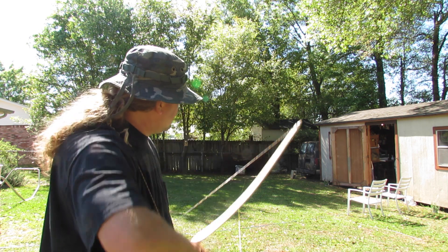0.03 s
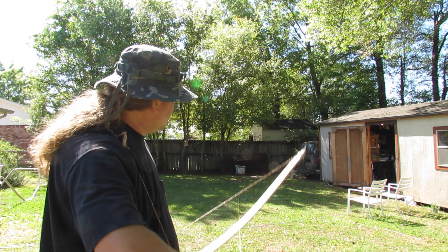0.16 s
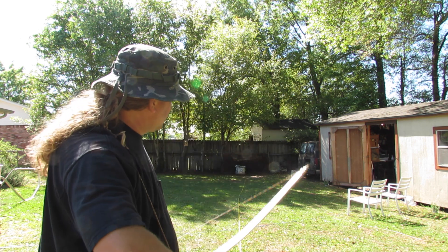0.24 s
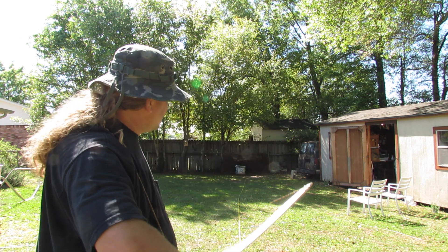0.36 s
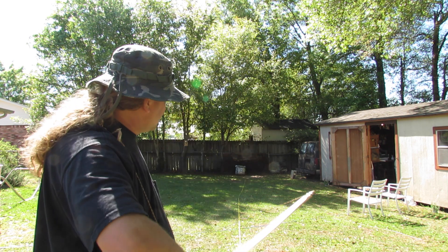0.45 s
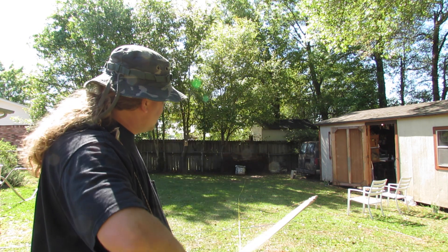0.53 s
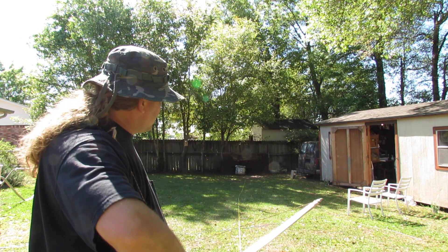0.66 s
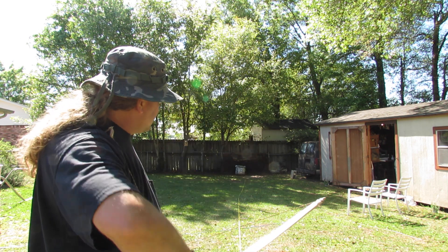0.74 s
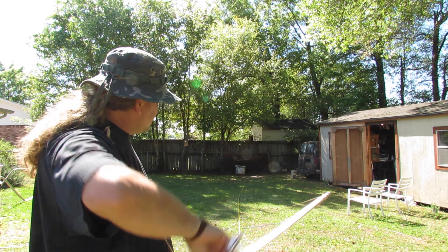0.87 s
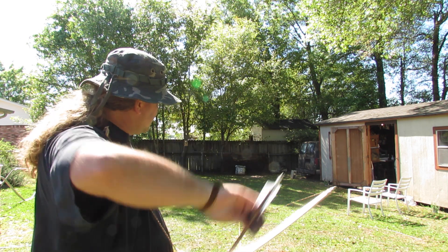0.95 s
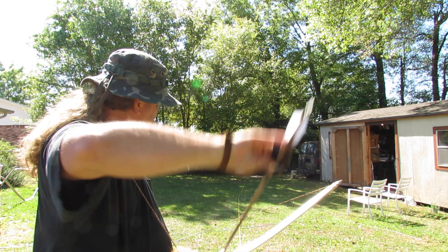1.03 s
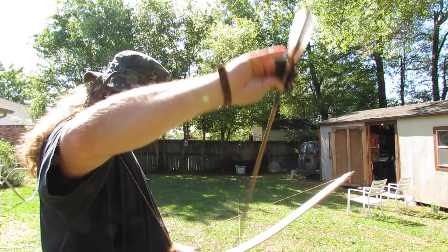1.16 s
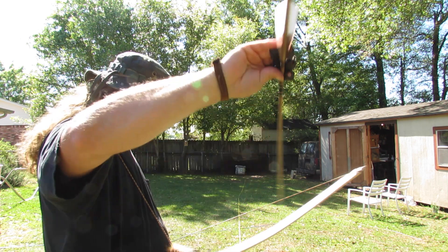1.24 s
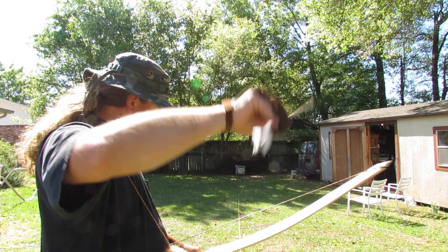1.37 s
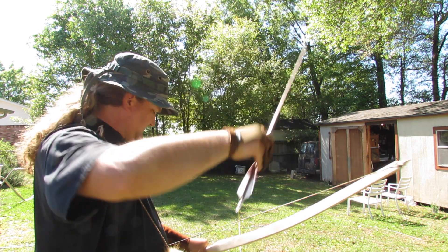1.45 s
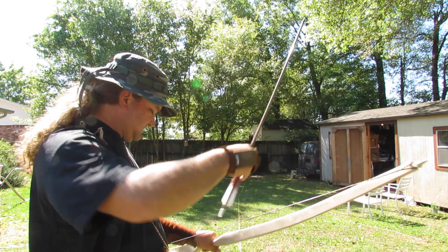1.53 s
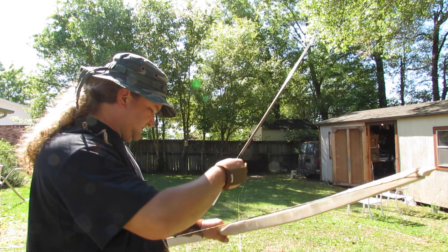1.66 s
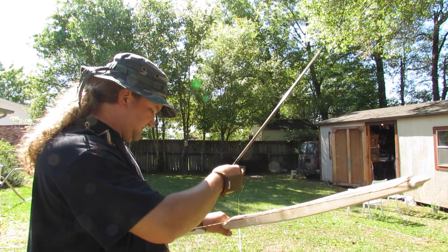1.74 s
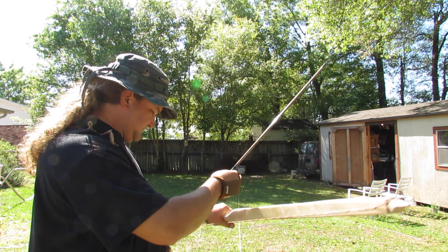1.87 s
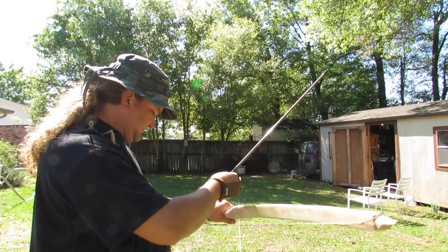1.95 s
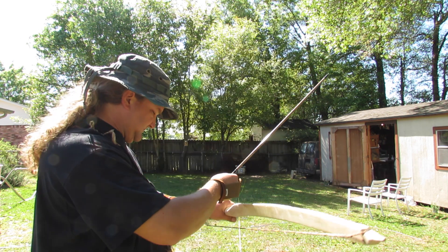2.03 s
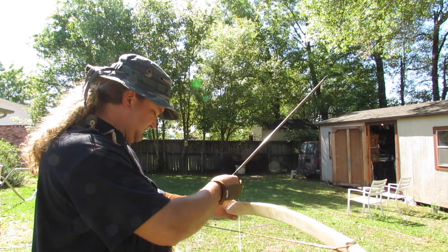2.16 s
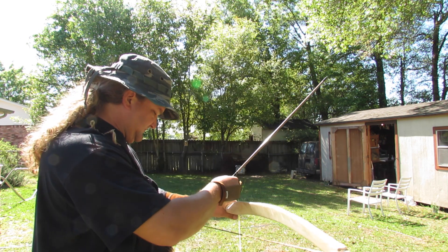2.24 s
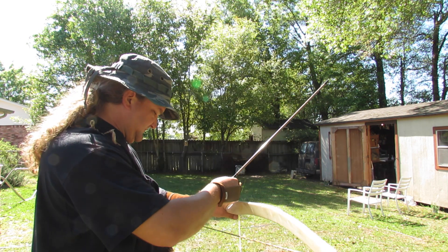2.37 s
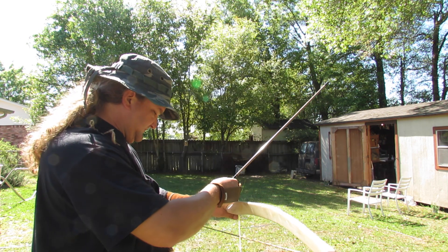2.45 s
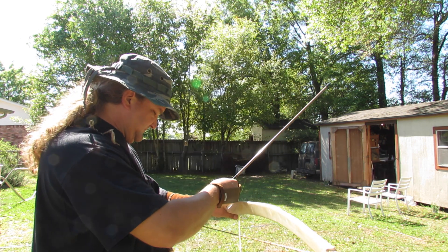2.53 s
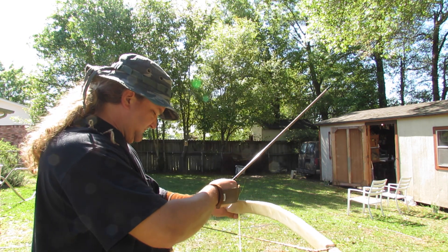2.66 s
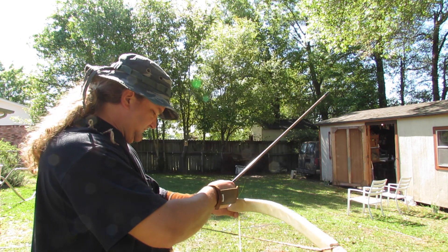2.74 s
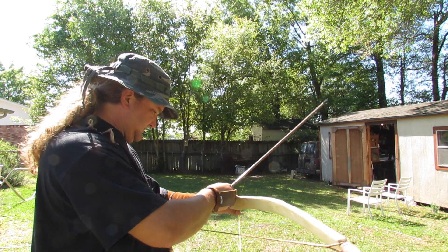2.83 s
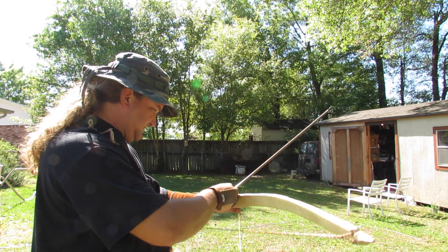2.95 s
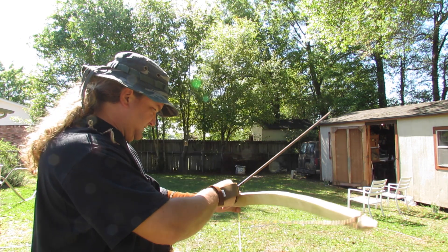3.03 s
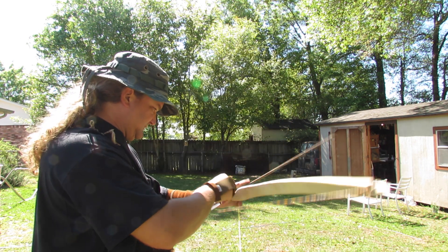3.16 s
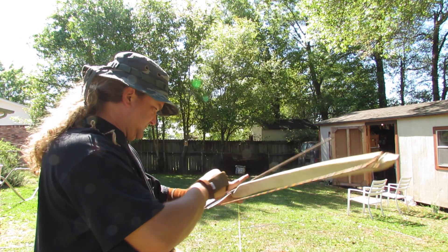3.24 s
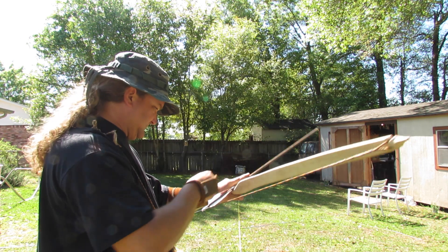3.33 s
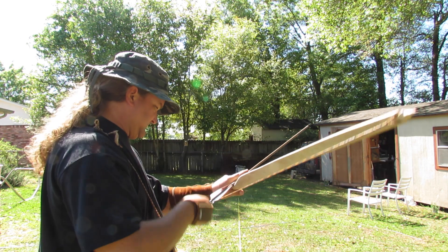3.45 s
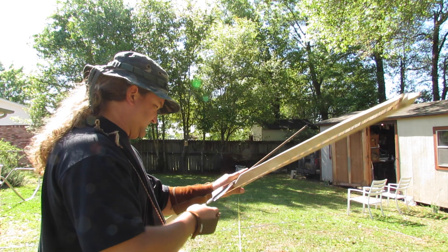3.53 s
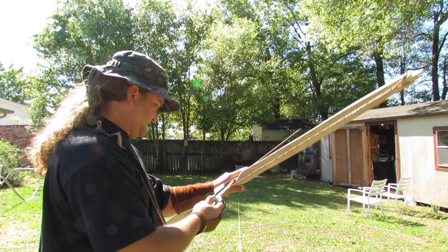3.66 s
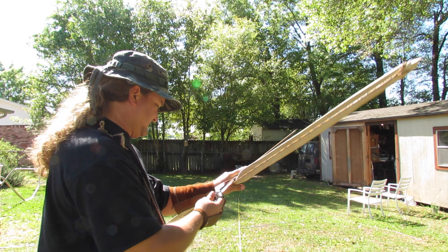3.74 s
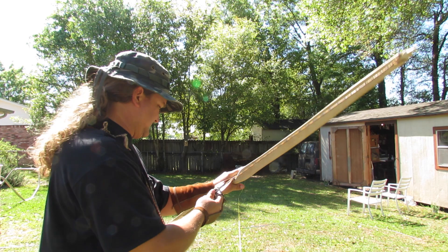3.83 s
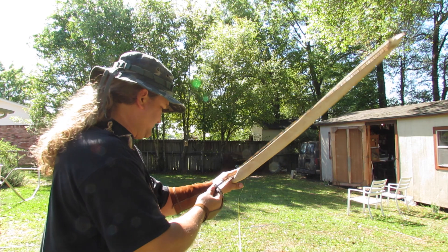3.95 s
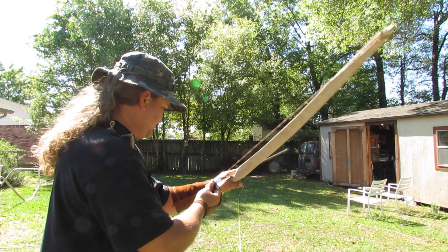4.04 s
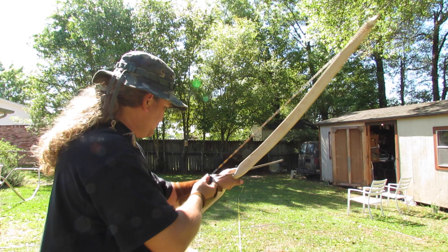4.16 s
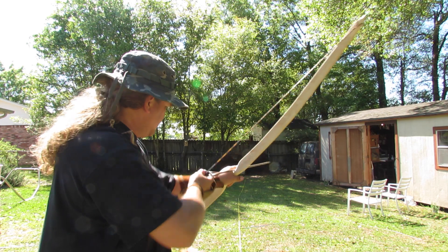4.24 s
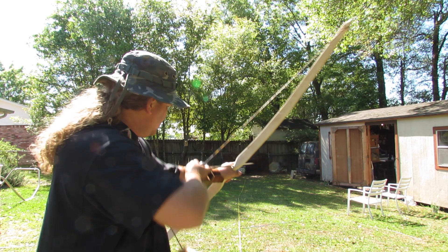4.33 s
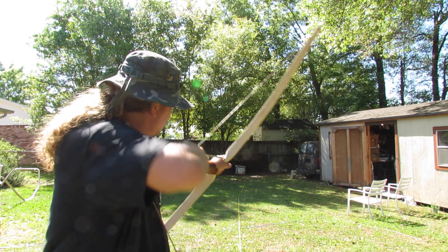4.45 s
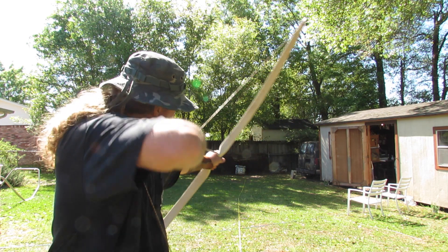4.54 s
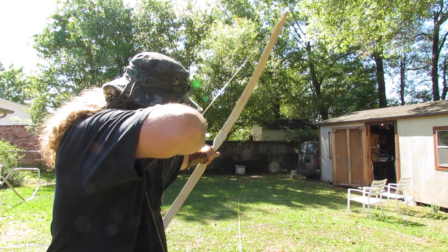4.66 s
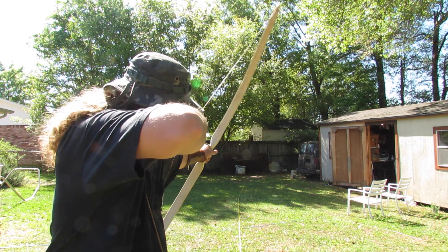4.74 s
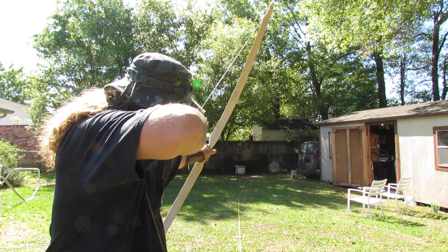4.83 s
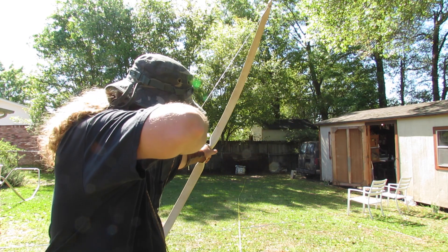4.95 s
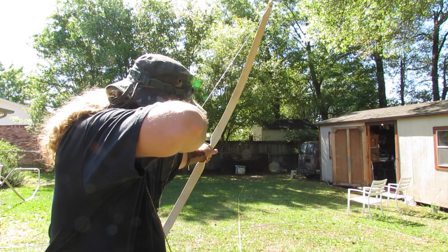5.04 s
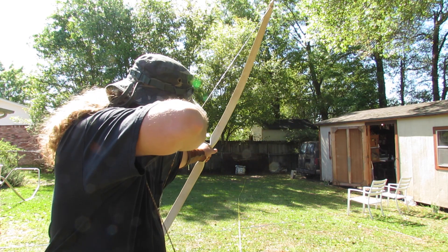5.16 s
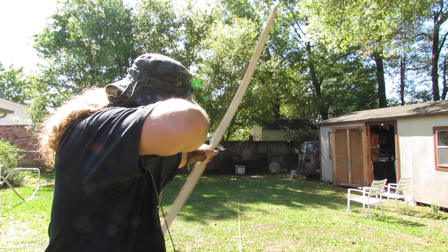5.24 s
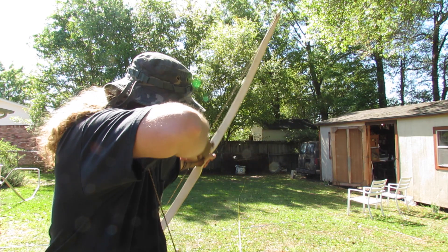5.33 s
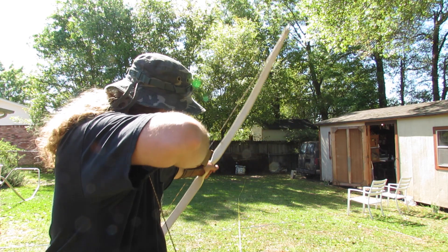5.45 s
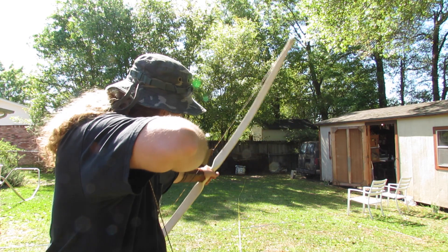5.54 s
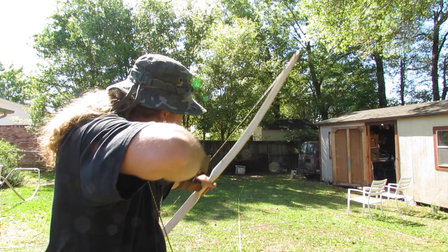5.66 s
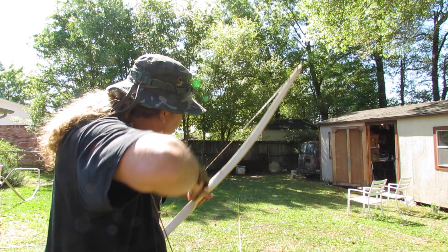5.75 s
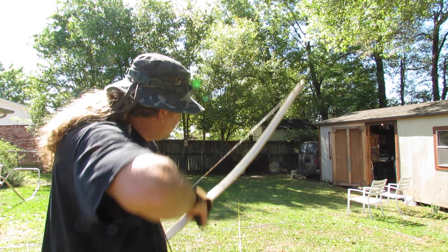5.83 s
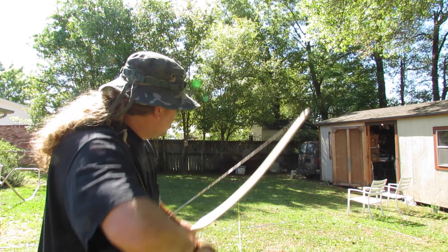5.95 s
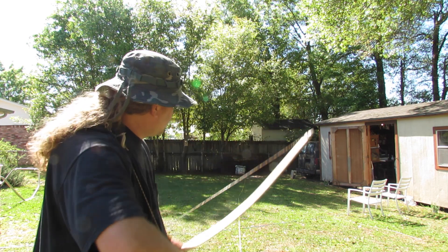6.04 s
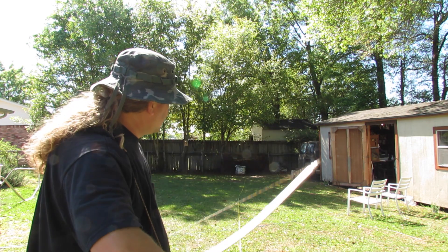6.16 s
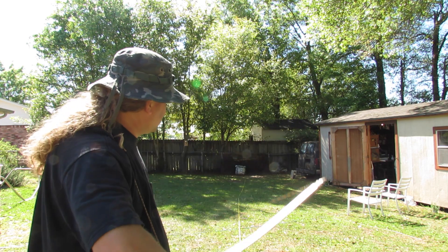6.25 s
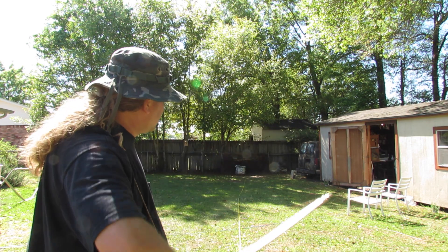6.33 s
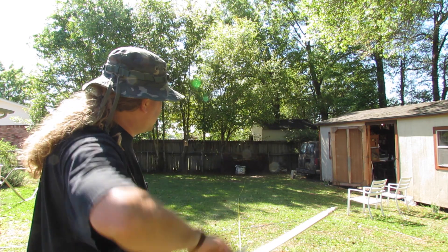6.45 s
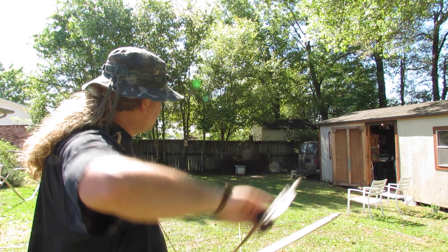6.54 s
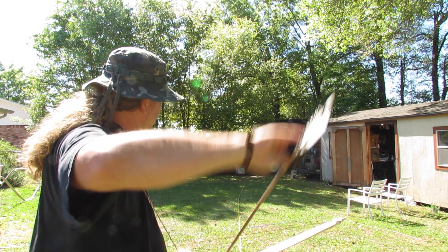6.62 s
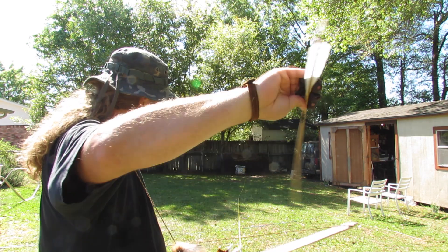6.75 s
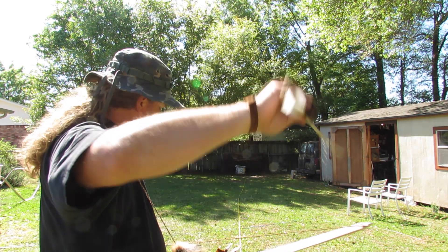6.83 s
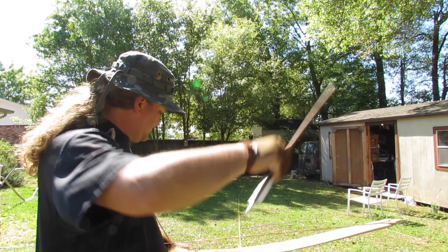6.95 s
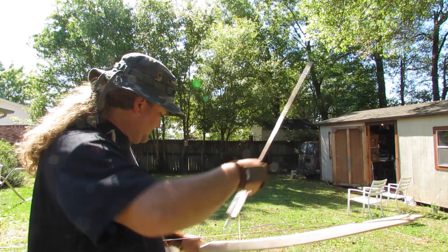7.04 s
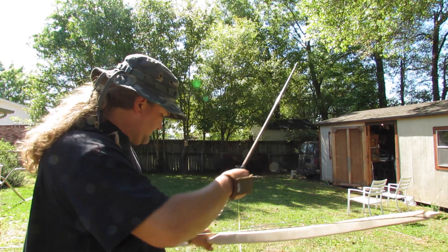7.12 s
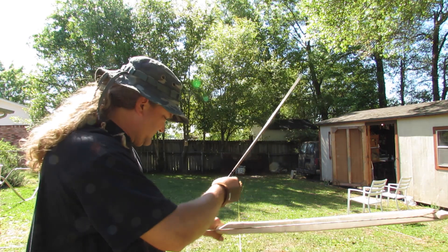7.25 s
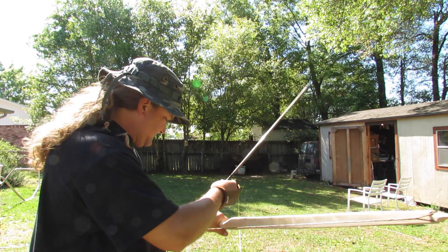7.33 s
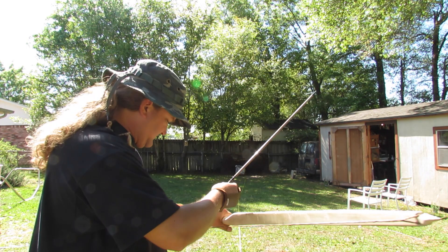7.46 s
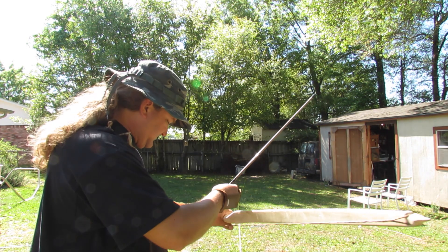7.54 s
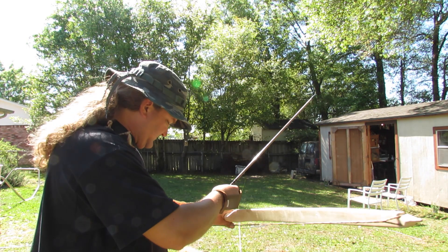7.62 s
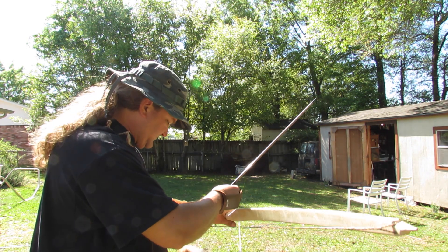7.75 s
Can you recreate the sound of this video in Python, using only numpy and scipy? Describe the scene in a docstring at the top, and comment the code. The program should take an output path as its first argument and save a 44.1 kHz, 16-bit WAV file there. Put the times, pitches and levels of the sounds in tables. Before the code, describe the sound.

Outdoors, close to an archer: cloth rustles and arrow shafts rattle as one is pulled out, then small wooden ticks as it is nocked on the bow. Wind bumps the microphone. The string cracks loudly, the arrow smacks a target about half a second later with short fence echoes, then rustling and light taps resume as another arrow is fetched. Faint birds and distant traffic.

```python
"""Breezy back yard: an archer pulls an arrow, nocks it, draws and shoots; the arrow smacks a far target.
Bow, target and arrow shafts are sums of dying modes; cracks, ticks and snaps are short noise bursts.
Cloth is hiss in clumps of tiny slips; birds are gliding sines; fences return sparse random echoes.
Gusts are single pressure cycles at the right microphone port; air and traffic are patchy noise.
"""
import sys
import numpy as np
from scipy import signal
from scipy.fft import rfft, irfft, next_fast_len
from scipy.io import wavfile
from scipy.ndimage import uniform_filter1d

SR = 44100
rng = np.random.default_rng(int(sys.argv[2]) if len(sys.argv) > 2 else 0)


def transcribe(signal):
    """Save signal, clipped to [-1, 1], as a 16-bit WAV file at the path in sys.argv[1]."""
    frames = np.atleast_2d(signal).T
    limited = np.clip(frames, -1, 1)
    pcm = np.round(limited * 32767).astype(np.int16)
    wavfile.write(sys.argv[1], SR, pcm)


N = 343539  # samples

BOW_PAN_DB = -0.6  # left over right, so slightly right
SMALL_HZ = 200  # bow and target are too small to radiate below this


def shot():
    """The shaft scrapes off, the string slaps home, the arrow lands; small bodies radiate little bass."""
    out = scrapes() + slap() + landing()
    return signal.lfilter(*signal.butter(2, SMALL_HZ, "high", fs=SR), out)


# String leaves the fingers, shaft scrapes past the bow hand, limbs rattle.
# Each row: start in seconds, rise in seconds, hold in seconds, fall in seconds, level in dB.
SCRAPE_ROWS = [(5.3027, 0.0034, 0.0048, 0.0065, -24.5), (5.309, .0015, 0.0043, 0.016, -21.5),
               (5.331, 0.0024, 0.0046, 0.018, -24.5)]
# Scrape spectrum. Each row: frequency in Hz, density in dB per Hz.
SCRAPE_SPECTRUM = [(240, -38), (400, -19), (1490, -5), (3750, -16), (6950, -18.5), (8240, -27),
                   (16000, -33)]


def scrapes():
    """Friction at the bow: coloured noise under short swells."""
    out = np.zeros((2, N))
    for start_s, rise_s, hold_s, fall_s, level_db in SCRAPE_ROWS:
        level = amp(level_db) * swell(rise_s, hold_s, fall_s)
        noise = coloured(pair(len(level), 0.92), SCRAPE_SPECTRUM)
        add(out, round(start_s * SR), level * noise, BOW_PAN_DB)
    return out


# String slap. One row: start in seconds, bow ring peak in dB, crack peak in dB.
SLAP_ROW = (5.3305, 1.9, 2)
# Bow modes. Each row: frequency in Hz, level in dB, t60 in seconds.
BOW_MODES = [(810, -4, 0.0052), (1190, 17.5, 0.0056), (1525, -11, 0.059), (8070, 6.5, 0.0038)]


def slap():
    """The string's stop excites the bow modes and a wide-band crack."""
    out = np.zeros((2, N))
    start_s, ring_db, crack_db = SLAP_ROW
    sound = amp(ring_db) * ring(BOW_MODES) + amp(crack_db) * crack(0.0081)
    add(out, round(start_s * SR), sound, BOW_PAN_DB)
    return out


# Arrow hit, then returns from ground, shed and fences.
# Each row: start in seconds, level before dulling in dB, pan as left over right in dB, dullness from 0 to 1.
LANDING_ROWS = [(5.7976, 8, -3, 0.25), (5.803, -4, -3.5, .1), (5.8147, 3, 5, 0.94), (5.861, -14, -1, 0.88),
                (5.892, -23, -1.5, 0.84), (5.984, -21, -1.5, 0.92)]
# Target modes. Each row: frequency in Hz, level in dB, t60 in seconds.
TARGET_MODES = [(389, -18, 0.052), (503, -11, 0.017), (670, -1.5, 0.0081), (1370, 3, 0.0044),
                (1783, 13, 0.0042), (2200, 6, 0.0045), (4750, -12, 0.008)]
SINK_S = 0.0016  # point sinks in: ring gain climbs by 1 per SINK_S, from 0.6 to 1.2
SMEAR = 0.15  # scatter t60 in seconds, per second of echo delay


def landing():
    """Target modes build up as the point sinks in; each later return is scattered and dulled."""
    out = np.zeros((2, N))
    t = np.arange(6000) / SR
    sinking = ring(TARGET_MODES) * np.minimum(t / SINK_S + 0.6, 1.2)
    sinking = sinking / abs(sinking).max()
    t = t[:2000]
    first_s = LANDING_ROWS[0][0]
    for start_s, level_db, pan_db, dull in LANDING_ROWS:
        blow = sinking + amp(-6.0) * crack(0.0048)
        dull = np.clip(dull, 0, 0.95)
        scatter_t60_s = SMEAR * abs(start_s - first_s) + 1e-5
        scatter = (rng.standard_normal(2000) + 3 * (t == 0)) * amp(-60 * t / scatter_t60_s)
        blow = signal.fftconvolve(blow, scatter[None] / np.linalg.norm(scatter), axes=1)
        dulled = signal.lfilter([1 - dull], [1, -dull], blow)
        add(out, round(start_s * SR), amp(level_db) * dulled, pan_db)
    return out


# Crack spectrum. Each row: frequency in Hz, density in dB per Hz.
CRACK_SPECTRUM = [(500, -28), (2200, 5.5), (3500, -10.5), (4700, -6.5), (6000, -15.5), (8000, -3),
                  (11000, -10), (16000, -46)]


def crack(t60_s):
    """Impact crack: a very short wide-band burst, peak 1."""
    burst = pair(6000, 0.69) * amp(-60 * np.arange(6000) / SR / t60_s)
    x = coloured(burst, CRACK_SPECTRUM)
    return x / abs(x).max()


# Shaft and nock taps.
# Each row: start in seconds, tick peak in dB, shaft ring in dB over the tick,
# bow wood in dB over the tick, place struck as a share of the shaft.
TAP_ROWS = [(0.313, -35, -11, -22, .3), (0.4407, -29.5, -8, -25, .07), (0.6612, -22.5, -10, -31, .07),
            (1.126, -21, 7, -14, .07), (2.864, -15, -13, -14.5, 0.1), (2.872, -33, -9, 9, .125),
            (3.0591, -28.5, -12, -23, .125), (3.2367, -25, -1, -4, 0.13), (3.243, -34.5, 5, 5, .125),
            (3.2505, -43, 3, 10, .11), (3.415, -34, -9, -5, .125), (5.31, -8, -16, -10, 0.15),
            (5.3357, -12.5, -4, -3, 0.1), (5.4175, -21.5, -13, -7, .125), (5.431, -26.5, -10, -13, .125),
            (6.2066, -42, 6.5, -15, 0.21), (6.3, -36.5, -8, -2, .12), (6.365, -28.5, -15, -23, .12),
            (6.592, -40, 14, -15, .44), (6.619, -39, 13.5, -15, .44), (6.645, -36, 12, -9, .44),
            (6.658, -38, 12, -15, .44), (6.682, -40, 11.5, -12, .4), (6.7192, -38, -9.5, -25, .12),
            (6.742, -36, -5, 3, .12), (6.767, -44, 5, -13, 0.32)]
# Arrow in hand. Each row: start of use in seconds, tuning as a ratio.
ARROW_ROWS = [(0, 1.0), (2, .955), (6, 1.045)]


def taps():
    """Arrow, nock and bow knock together, each arrow with its own tuning."""
    out = np.zeros((2, N))
    for start_s, level_db, ring_db, wood_db, place in TAP_ROWS:
        tune = [ratio for from_s, ratio in ARROW_ROWS if from_s <= start_s][-1]
        add(out, round(start_s * SR), amp(level_db) * tap(ring_db, wood_db, place, tune))
    return out


# Dull part of a tick. Each row: frequency in Hz, density in dB per Hz.
TICK_SPECTRUM = [(150, -45), (500, -22), (1300, -5), (2700, 6.5), (5000, -2), (9000, -15), (14000, -38)]
# Bow wood modes under a tap. Each row: frequency in Hz, level in dB, t60 in seconds.
STAVE_MODES = [(758, -4.5, 0.07), (900, -1.5, 0.06), (1150, 1, 0.025), (1300, 2.5, 0.037), (1525, 3, 0.05),
               (2370, 3, 0.03)]
BRIGHT_DB, BRIGHT_PER_RING = -23.5, -1  # the less a tap rings, the brighter its tick


def tap(ring_db, wood_db, place, tune):
    """A short tick with a dull and a bright part; the blow rings shaft and bow wood."""
    t = np.arange(3000) / SR
    burst = pair(len(t), 0.51) * amp(-60 * t / 0.01) * np.minimum(t / 0.00042, 1)
    bright = amp(BRIGHT_DB + BRIGHT_PER_RING * ring_db) * coloured(burst, BRIGHT_SPECTRUM)
    tick = coloured(burst, TICK_SPECTRUM) + bright
    # first contact, then chatter; a blunt blow favours low modes
    contact = pair(len(t), 0.86) * amp(-60 * t / 0.012) + 5 * (t == 0)
    push = signal.lfilter([0.3], [1, -0.7], contact)
    body = shaft(push, 0.78, tune, place)
    wood = signal.oaconvolve(push, ring(STAVE_MODES, count=3000)[None], axes=1)[:, :len(t)]
    tick, body, wood = [x / abs(x).max() for x in (tick, body, wood)]
    return tick + amp(ring_db) * body + amp(wood_db) * wood


# Arrow bending modes, fourth upward, before tuning and widening.
# Each row: frequency in Hz, width in Hz, level in dB.
SHAFT_MODES = [(1590, 80, -9), (2000, 70, 0), (2330, 80, -3), (2920, 75, 3), (3386, 65, 4), (4010, 100, -1),
               (4480, 100, -4), (5070, 120, -2), (6150, 140, -7)]


def shaft(x, wider, tune, place):
    """Rings one arrow's modes; a mode with a node at the place struck stays quiet."""
    number = np.arange(4, 4 + len(SHAFT_MODES))
    shape = abs(np.sin(np.pi * place * number)) + 0.05
    modes = []
    for (hz, width_hz, level_db), gain in zip(SHAFT_MODES, shape):
        t60_s = np.log(1000) / (np.pi * wider * width_hz)
        modes.append((tune * hz, level_db + 20 * np.log10(gain), t60_s))
    return signal.oaconvolve(x, ring(modes, count=3000)[None], axes=1)[:, :x.shape[1]]


# Strokes of the hands.
# Each row: start in seconds, rise in seconds, hold in seconds, fall in seconds,
# cloth rubbing in dB, cloth tilt in dB per octave, shafts scraping in dB.
STROKE_ROWS = [(0.137, 0.034, 0.012, 0.17, -60, 0, -57), (0.3, 0.012, 0.011, 0.017, -42.5, 0.5, -48),
               (0.347, 0.054, 0.026, 0.13, -52.5, 2, -49), (0.635, 0.019, 0.0045, .04, -41.5, -3, -46),
               (0.652, 0.099, 0.2, 0.038, -42, 0.5, -41), (0.928, 0.074, .1, 0.043, -44.5, -4.5, -39.5),
               (1.116, .012, 0.0055, 0.11, -43, -3.5, -40), (1.347, 0.042, 0.038, 0.07, -55.5, 3, -66),
               (3.017, 0.09, 0.0081, 0.084, -50.5, 0.5, -69), (4.159, 0.11, .21, 0.26, -47, -1.5, -54),
               (6.126, 0.007, 0.014, 0.025, -47, -1.5, -50.5), (6.224, .14, 0.019, 0.053, -45, -0.5, -50),
               (6.379, 0.055, 0.042, 0.015, -43, 1, -49.5), (6.448, .14, 0.11, 0.031, -43, -4, -46),
               (6.715, .024, .005, 0.046, -39, 0, -38.5), (6.786, 0.026, 0.023, 0.018, -40.5, 10, -70),
               (7.075, 0.13, 0.0051, 0.03, -50.5, -0.5, -62)]


def strokes():
    """Hands move cloth and shafts together under one swell per stroke."""
    out = np.zeros((2, N))
    for start_s, rise_s, hold_s, fall_s, cloth_db, tilt_db, shaft_db in STROKE_ROWS:
        stroke = swell(rise_s, hold_s, fall_s)
        count = len(stroke)
        clumps = amp(2.0 * np.array([evened(wander(count, 500)) for _ in range(4)]))
        sound = amp(cloth_db) * cloth(clumps[0], tilt_db) + amp(shaft_db) * rattle(clumps[1:])
        add(out, round(start_s * SR), sound * stroke)
    return out


# Cloth spectrum before tilt. Each row: frequency in Hz, density in dB per Hz.
CLOTH_SPECTRUM = [(1180, -16.5), (2000, -17), (2280, -4.5), (3260, -1), (11900, -5.5), (14700, -14),
                  (16000, -45)]


def cloth(clumps, tilt_db):
    """Cloth rubs as hiss in clumps of tiny slips, about 8000 a second."""
    count = len(clumps)
    slips = amp(2.0 * np.minimum(rng.exponential(1, count), 5)) * (rng.random(count) < 8000 / SR)
    tilted = [(hz, db + tilt_db * np.log2(hz / 6000)) for hz, db in CLOTH_SPECTRUM]
    return patchy(coloured(pair(count, 0.6) * clumps ** 0.91 * slips, tilted), 3.3)


def rattle(clumps):
    """Three shafts scrape and rattle: random knocks, about 1200 a second each, ring their modes."""
    size = amp(2.16 * np.minimum(rng.exponential(1, clumps.shape), 4))
    knocks = clumps ** 1.4 * size * (rng.random(clumps.shape) < 1200 / SR)
    tunes, places = (0.92, 1.0, 1.07), 0.036 + 0.16 * rng.random(3)
    shafts = 0
    for knock, tune, place in zip(knocks, tunes, places):
        shafts = shafts + shaft(pair(len(knock), 0.76) * knock, 2.6, tune, place)
    return patchy(shafts, 4.0, frames=15.4, bins=2.4)


# Dry snaps of feather and cloth. Each row: start in seconds, peak in dB.
SNAP_ROWS = [(.1702, -40), (.2645, -42), (.2824, -40), (.3747, -37), (0.4204, -34), (.5543, -37),
             (1.221, -34), (1.3827, -30), (1.4137, -26), (1.4245, -33), (1.4319, -27), (1.436, -28),
             (1.4505, -36), (2.8246, -36.5), (4.254, -40), (4.264, -35), (4.447, -33), (6.131, -33),
             (6.812, -30), (6.829, -31), (7.13, -36.5)]


def snaps():
    """Feather and cloth snap as separate clicks."""
    out = np.zeros((2, N))
    for start_s, level_db in SNAP_ROWS:
        add(out, round(start_s * SR), amp(level_db) * snap())
    return out


# Bright part of a tick, and all of a snap. Each row: frequency in Hz, density in dB per Hz.
BRIGHT_SPECTRUM = [(3000, -33), (6000, 7.5), (9000, 6), (13000, -6), (17000, -17)]
SNAP_T60_S = 0.0077


def snap():
    """A dry bright noise click with no ring, peak 1."""
    burst = pair(600, 0.69) * amp(-60 * np.arange(600) / SR / SNAP_T60_S)
    x = coloured(burst, BRIGHT_SPECTRUM)
    return x / abs(x).max()


# Rising call.
# Each row: time in seconds, pitch in Hz, partial 2 in dB, partial 3 in dB, partial 4 in dB.
CALL_CURVE = [(1.27, 1210, -72, -56, -65), (1.3, 1370, -69, -58, -58), (1.366, 1525, -58, -62, -76),
              (1.4, 1520, -59, -81, -80), (1.47, 1546, -61, -62, -80), (1.68, 1896, -52.5, -62, -75),
              (1.732, 2060, -56, -63, -86), (1.85, 2060, -73, -77, -86)]
# Short whistles.
# Each row: start in seconds, length in seconds, first pitch in Hz, last pitch in Hz, level in dB.
WHISTLE_ROWS = [(3.696, 0.15, 5730, 3400, -59), (4.051, 0.08, 5350, 4750, -56),
                (6.31, .04, 3419, 4030, -50), (7.319, .06, 4010, 3740, -57),
                (7.669, 0.055, 4050, 3130, -54.5), (7.687, 0.18, 2416, 2900, -55)]
GLIDE, WHISTLE_FADE_DB = 1.05, -8  # glide exponent; level lost by the end


def birds():
    """Far near-sine whistles that tremble in pitch and level."""
    out = np.zeros((2, N))
    pitch_tremble, level_tremble = [evened(wander(N, 300)) for _ in range(2)]
    at, (hz, *levels_db) = track(CALL_CURVE)
    turns = np.cumsum(hz * (1 + 0.005 * pitch_tremble[:len(hz)])) / SR
    call = sum(amp(db) * np.sin(2 * np.pi * k * turns) for k, db in enumerate(levels_db, 2))
    add(out, at, call * signal.windows.tukey(len(hz), 0.05), 1.5)
    for start_s, length_s, first_hz, last_hz, level_db in WHISTLE_ROWS:
        u = np.linspace(0, 1, round(length_s * SR))
        hz = first_hz + (last_hz - first_hz) * u ** GLIDE
        turns = np.cumsum(hz * (1 + 0.0155 * pitch_tremble[:len(u)])) / SR
        level = amp(level_db + WHISTLE_FADE_DB * u) * signal.windows.tukey(len(u), 0.3)
        add(out, round(start_s * SR), level * np.sin(2 * np.pi * turns))
    return out * amp(3.2 * level_tremble)


# Near echo decay. Each row: frequency in Hz, t60 in seconds.
FENCE_T60 = [(200, 0.47), (600, 0.16), (1500, 0.19), (3000, 0.26), (7000, 0.16), (16000, 0.18)]
# Trees and houses, under the near echoes. Each row: frequency in Hz, level in dB.
FAR_RETURN_LEVEL = [(130, -40), (300, -18.5), (1500, -12.5), (2800, -20), (4800, -11), (11000, -22)]


def fences(x, gap=200):
    """Sparse random-sign echoes: near fences and shed, then a fainter, longer return from trees and houses."""
    count, step = SR // 2, 20
    echoes = np.zeros((2, count))
    slots = np.arange(gap, count - step, step)
    at = slots + rng.integers(0, step, (2, len(slots)))
    np.put_along_axis(echoes, at, rng.choice([-1.0, 1.0], at.shape), 1)
    echoes += 0.5 * echoes[::-1]
    hz, t, z = signal.stft(echoes, SR, nperseg=256)
    fall_db = -60 * t / np.maximum(read(FENCE_T60, hz), 0.01)[:, None]
    far_db = fall_db / 4 + read(FAR_RETURN_LEVEL, hz)[:, None]  # four times the t60
    tail = signal.istft(z * (amp(fall_db) + amp(far_db)), SR, nperseg=256)[1]
    return signal.fftconvolve(x.mean(0)[None], tail / np.linalg.norm(tail[0]), axes=1)[:, :N]


# Strong thumps. Each row: centre in seconds, level in dB.
THUMP_ROWS = [(3.758, -12.5), (3.821, -11), (3.844, -11), (3.951, -10.5), (4.039, -13), (4.069, -13),
              (4.092, -9), (4.141, -14), (4.285, -11), (4.378, -9), (4.394, -8.5), (5.019, -6),
              (5.057, -5.5), (5.134, 1), (5.212, -11), (5.274, -9.5), (5.293, -11), (5.544, -11),
              (6.598, -9.5), (6.706, -10), (6.831, -11.5), (6.885, -11), (7.356, -11.5), (7.603, -12.5),
              (7.735, -11), (7.771, -9)]
# Gusts that drive the small thumps.
# Each row: start in seconds, rise in seconds, hold in seconds, fall in seconds, level in dB.
GUST_ROWS = [(3.7, 0.21, 1.74, 0.47, -27), (6.18, 0.37, 1.46, .1, -33)]


def wind():
    """Eddies thump the right port; the left carries them weaker and inverted."""
    port = np.zeros((2, N))
    for (centre_s, level_db), (phase, speed) in zip(THUMP_ROWS, rng.random((len(THUMP_ROWS), 2))):
        hz = 200 * amp(0.45 * level_db) * (0.72 + 0.89 * speed)  # stronger eddies are quicker
        add(port, round(centre_s * SR) - 800, amp(level_db) * thump(hz, 2 * np.pi * phase))
    small = np.zeros(N)
    for hz in np.geomspace(60, 200, 8):
        size = amp(2.17 * rng.exponential(1, N)) * (rng.random(N) < 10 / SR)  # about 10 a second
        small += signal.oaconvolve(size, thump(hz, 2 * np.pi * rng.random()), "same")
    small = evened(small)
    for start_s, rise_s, hold_s, fall_s, level_db in GUST_ROWS:
        at = round(start_s * SR)
        gust = swell(rise_s, hold_s, fall_s)[:N - at]
        add(port, at, amp(level_db) * gust * small[at:][:len(gust)])
    # some turbulence is private to each port
    own = (0.038 * rng.standard_normal((2, N // 64 + 1))).repeat(64, 1)[:, :N]
    port = port * ([[-0.5], [1]] + own)
    return signal.sosfilt(signal.butter(4, 650, fs=SR, output="sos"), port)


def thump(hz, phase, turns=0.22):
    """One eddy: about one cycle of pressure that swells and dies."""
    t = np.arange(-800, 800) / SR
    return np.cos(2 * np.pi * hz * t + phase) / np.cosh(t * hz / turns)


# Steady air and far rumble. Each row: frequency in Hz, density in dB per Hz.
YARD_SPECTRUM = [(20, -16), (50, -1), (100, 1.9), (300, -7), (600, -16.5), (1500, -20), (3000, -22),
                 (6000, -27.5), (11000, -33), (16000, -46)]
YARD_DB = -48
# Distant traffic. Each row: frequency in Hz, density in dB per Hz.
TRAFFIC_SPECTRUM = [(200, -15.5), (500, -4), (900, 1.5), (1400, -5.5), (2300, -14.5), (4000, -35)]
# Traffic swell. Each row: time in seconds, level in dB.
TRAFFIC_LEVEL = [(0, -49.5), (1.06, -47.5), (1.5, -46.5), (2.342, -45), (3.992, -48), (4.73, -47.5),
                 (6.2, -50), (6.662, -46.5), (7.79, -46)]


def yard():
    """Steady air under a distant traffic wash that swells."""
    s, level_db = np.transpose(TRAFFIC_LEVEL)
    traffic_db = np.interp(np.arange(N) / SR, s, level_db)
    return amp(YARD_DB) * bed(YARD_SPECTRUM, 0.99) + amp(traffic_db) * bed(TRAFFIC_SPECTRUM, 1.05)


# Left-right likeness. Each row: frequency in Hz, likeness from 0 to 1.
LIKENESS = [(60, 0.68), (950, 0), (15000, 0.06)]


def bed(points, patchy_db):
    """Diffuse noise: random short-time spectra with drifting patches, rms 1."""
    frames, hz = N // 256 + 5, np.fft.rfftfreq(1024, 1 / SR)
    a, b, c, d, patches = rng.standard_normal((frames, 513, 5)).T
    patches = evened(uniform_filter1d(uniform_filter1d(patches, 14, 0), 16, 1))
    same = np.clip(read(LIKENESS, hz), -1, 1)[:, None]
    left = a + 1j * b
    right = same * left + np.sqrt(1 - same ** 2) * (c + 1j * d)
    z = np.array([left, right]) * amp(read(points, hz)[:, None] + patchy_db * patches)
    return evened(signal.istft(z, nperseg=1024, noverlap=768)[1][:, :N])


def amp(db):
    """Gain of a level in dB."""
    return 10 ** (np.asarray(db) / 20)


def evened(x):
    """Scales to rms 1."""
    return x / np.sqrt(np.mean(x ** 2) + 1e-20)


def wander(count, width):
    """White noise smoothed over a width in samples."""
    return uniform_filter1d(rng.standard_normal(count), width)


def read(points, hz):
    """Reads a spectrum table on a log-frequency axis."""
    f, value = np.transpose(points)
    return np.interp(np.log(hz + 1), np.log(f + 1), value)


def track(rows):
    """First sample and per-sample columns of a curve."""
    s, *columns = np.transpose(rows)
    t = np.arange(s[0], s[-1], 1 / SR)
    return round(s[0] * SR), [np.interp(t, s, c) for c in columns]


def add(mix, at, sound, pan_db=0.0):
    """Mixes a mono or stereo sound in at a sample; positive pan is left."""
    part = mix[:, max(at, 0):][:, :np.shape(sound)[-1]]
    part += (sound * amp([[pan_db / 2], [-pan_db / 2]]))[:, :part.shape[1]]


def coloured(x, points):
    """Filters by a spectrum table, rms 1."""
    count = x.shape[-1]
    size = next_fast_len(count + 512)
    gain = amp(read(points, np.fft.rfftfreq(size, 1 / SR)))
    return evened(irfft(rfft(x, size) * gain, size)[..., :count])


def pair(count, same):
    """Two noise channels that share a part."""
    a, b, c = rng.standard_normal((3, count))
    same = np.clip(same, 0, 1)
    return np.sqrt(same) * a + np.sqrt(1 - same) * np.array([b, c])


def ring(modes, count=6000):
    """Struck body: sum of dying modes, peak 1."""
    t = np.arange(count) / SR
    x = sum(amp(db - 60 * t / t60_s) * np.sin(2 * np.pi * hz * t) for hz, db, t60_s in modes)
    return x / abs(x).max()


def patchy(x, depth_db, frames=14, bins=5):
    """The contact point wanders, so bands of the sound swell and fade in turn; rms 1."""
    z = signal.stft(x, nperseg=256, noverlap=192)[2]
    patches = rng.standard_normal(z.shape[:0:-1]).T
    patches = evened(uniform_filter1d(uniform_filter1d(patches, round(bins), 0), round(frames), 1))
    return evened(signal.istft(z * amp(depth_db * patches), nperseg=256, noverlap=192)[1][:, :x.shape[1]])


FADE_DB = -15.5  # swell ends, under its top, before the edge ramps


def swell(rise_s, hold_s, fall_s):
    """Attack, hold and release, straight in dB, with short linear ramps to zero at the edges."""
    t = np.arange(0, rise_s + hold_s + fall_s, 1 / SR)
    level_db = np.interp(t, np.cumsum([0, rise_s, hold_s, fall_s]), [FADE_DB, 0, 0, FADE_DB])
    edge = np.minimum(t / rise_s, (t[-1] - t) / fall_s) / 0.065
    return amp(level_db) * np.minimum(edge, 1)


NEAR_WET_DB, SHOT_WET_DB, FAR_WET_DB = -16.5, -12.5, -14  # echo sends: hands, shot, birds


def scene():
    """Archer near, target and birds far, all in the yard's echoes, over wind and air."""
    near = strokes() + taps() + snaps()
    loud, far = shot(), birds()
    echoes = fences(amp(NEAR_WET_DB) * near + amp(SHOT_WET_DB) * loud + amp(FAR_WET_DB) * far)
    return near + loud + far + echoes + wind() + yard()


EDGE_HZ = 16300  # top of the band


def record(dry):
    """A low cut, gain control that ducks after the loudest hits, clipped peaks, then the band limit."""
    dry = signal.lfilter(*signal.butter(2, 45, "high", fs=SR), dry)
    power = uniform_filter1d((dry ** 2).mean(0), 200, origin=99)
    power_db = 10 * np.log10(abs(power) + 1e-12)
    fall_db = np.arange(N) * 4.8 / SR  # detector falls 4.8 dB a second
    held_db = np.maximum.accumulate(power_db + fall_db) - fall_db
    over_db = np.maximum(held_db + 16.0, 0)  # threshold -16 dB
    duck_db = 0.34 * uniform_filter1d(over_db, 1200, origin=599)
    ducked = np.clip(dry / amp(duck_db), -1, 1)
    lowpass = signal.firwin(511, EDGE_HZ, window=("kaiser", 9), fs=SR)
    return signal.oaconvolve(ducked, lowpass[None], "same")


dry = scene()
out = record(dry)
transcribe(out)
```